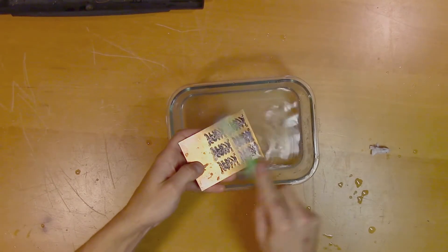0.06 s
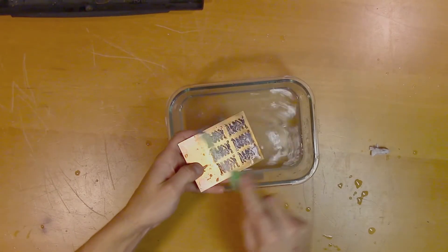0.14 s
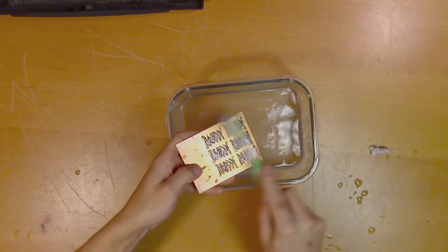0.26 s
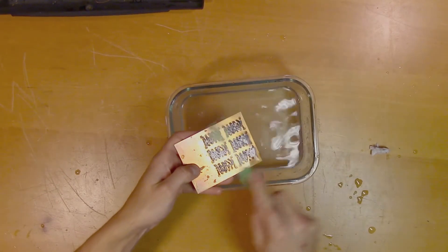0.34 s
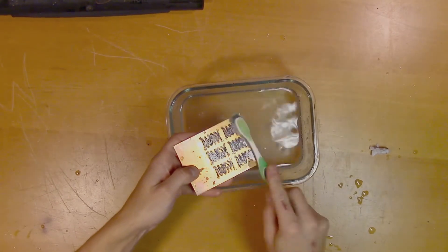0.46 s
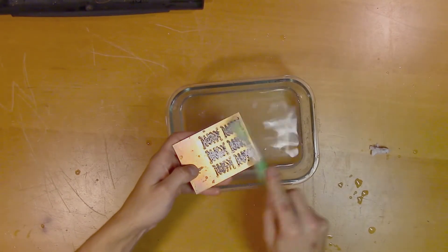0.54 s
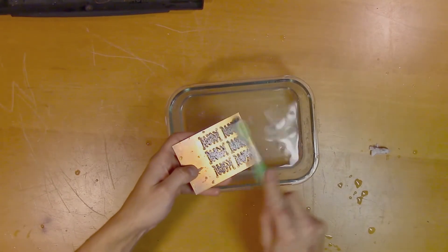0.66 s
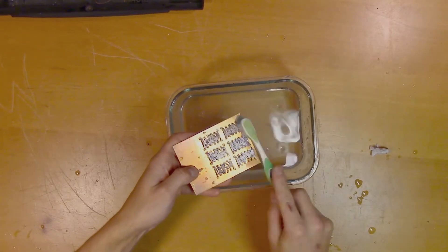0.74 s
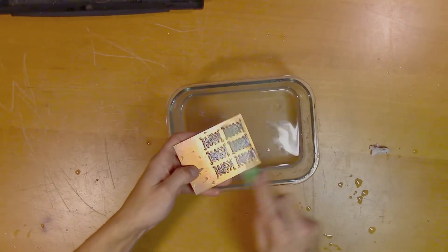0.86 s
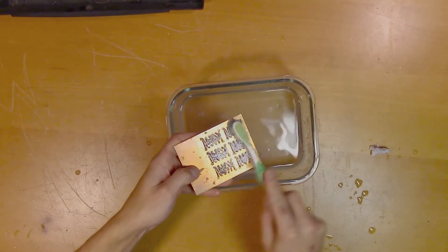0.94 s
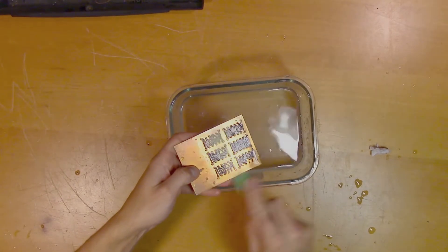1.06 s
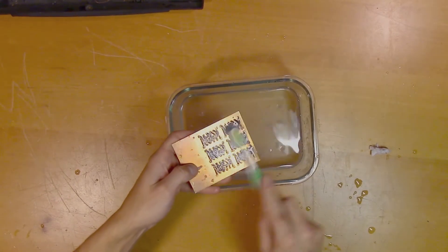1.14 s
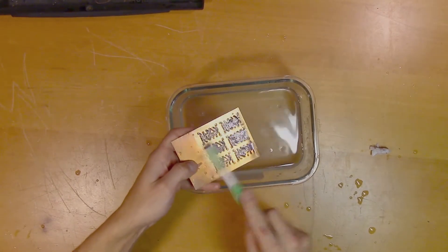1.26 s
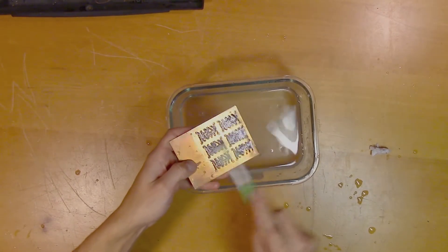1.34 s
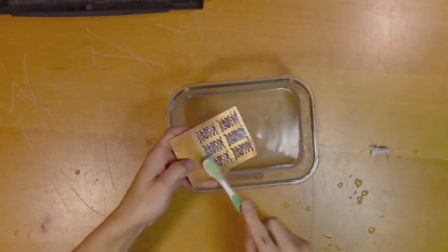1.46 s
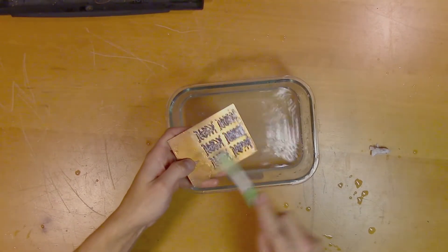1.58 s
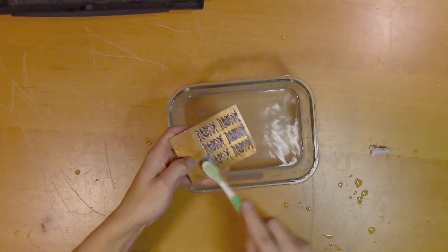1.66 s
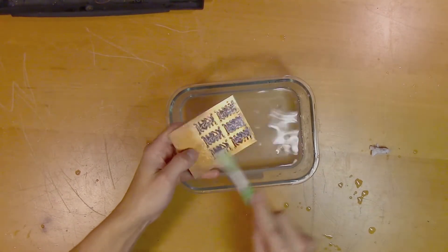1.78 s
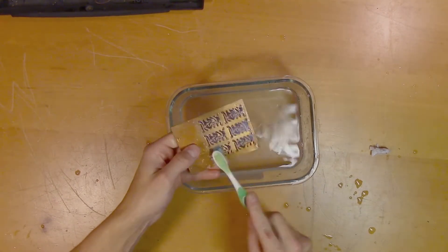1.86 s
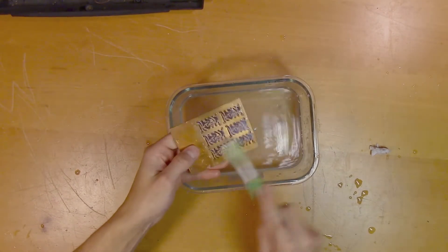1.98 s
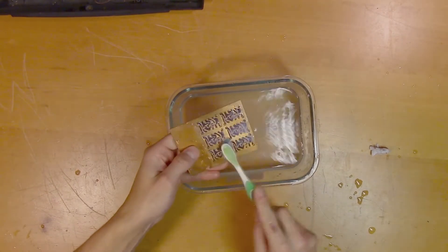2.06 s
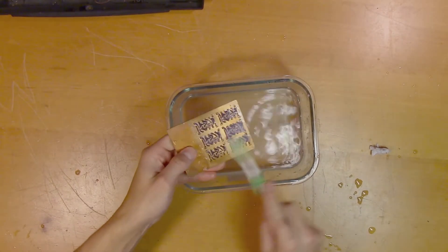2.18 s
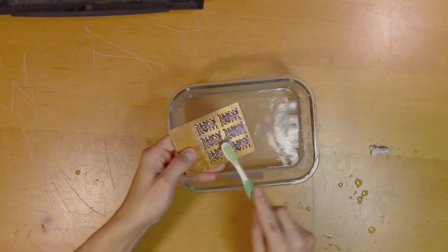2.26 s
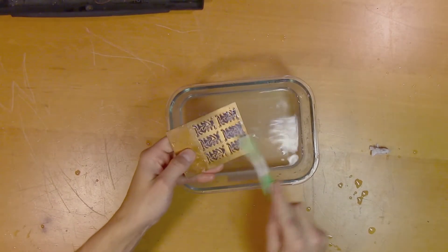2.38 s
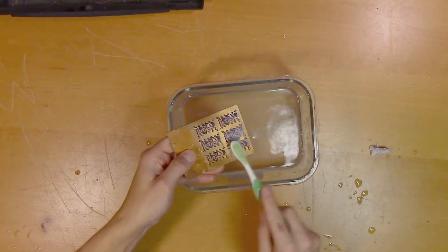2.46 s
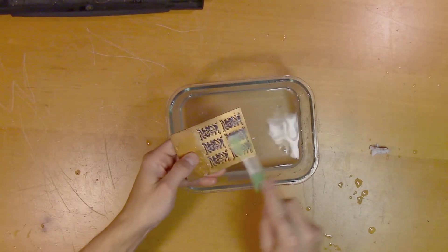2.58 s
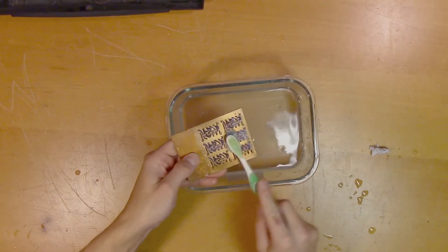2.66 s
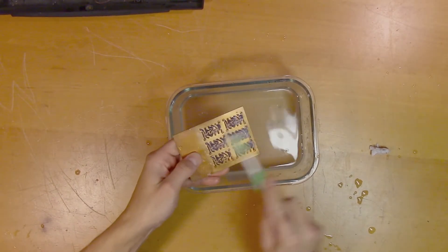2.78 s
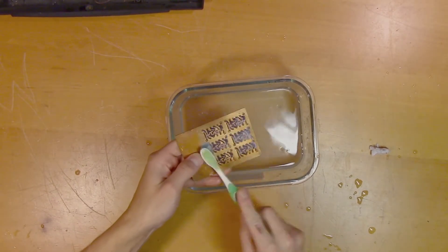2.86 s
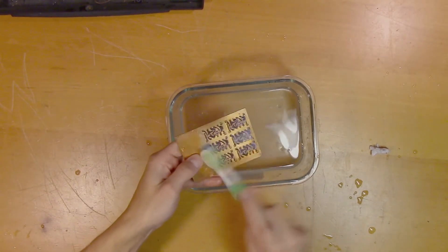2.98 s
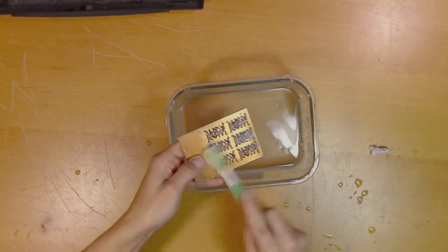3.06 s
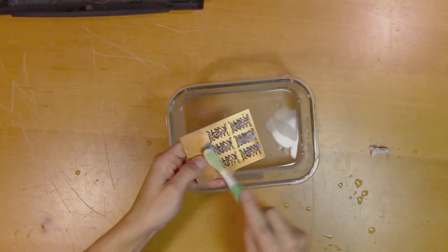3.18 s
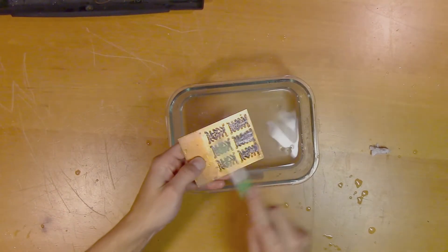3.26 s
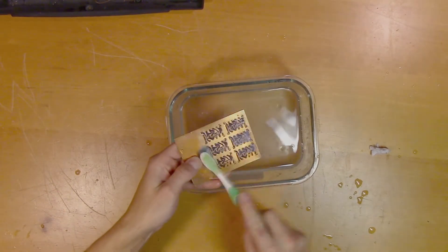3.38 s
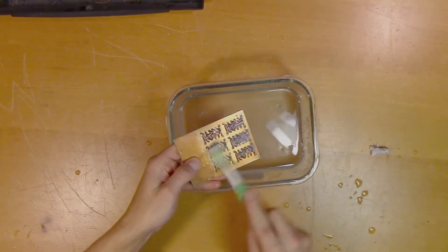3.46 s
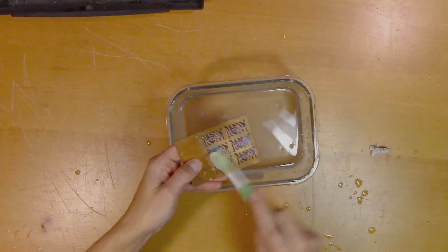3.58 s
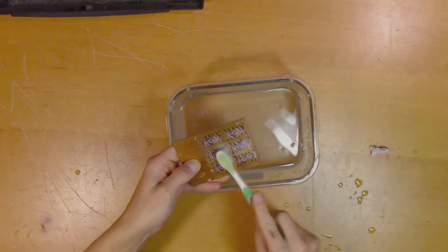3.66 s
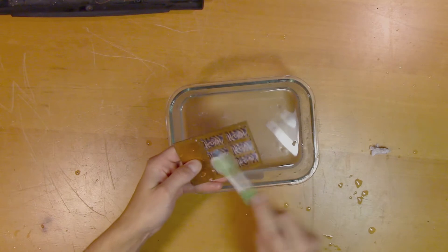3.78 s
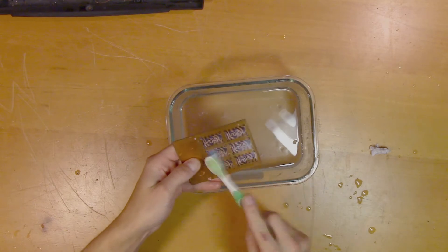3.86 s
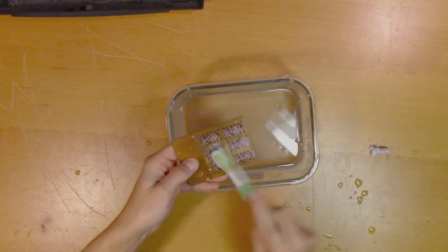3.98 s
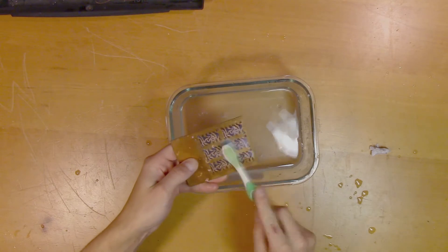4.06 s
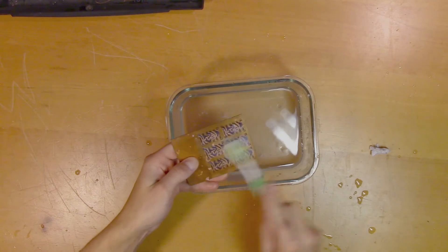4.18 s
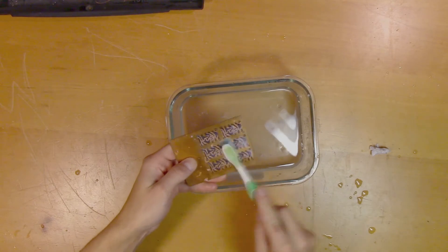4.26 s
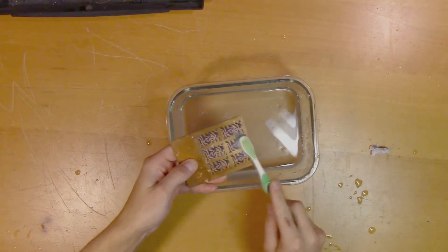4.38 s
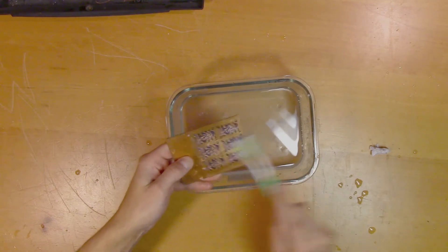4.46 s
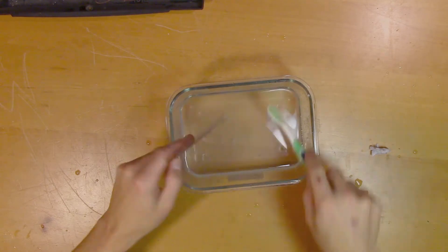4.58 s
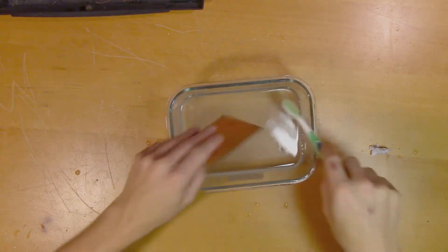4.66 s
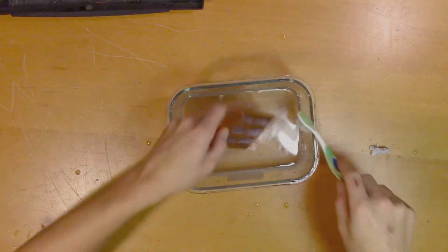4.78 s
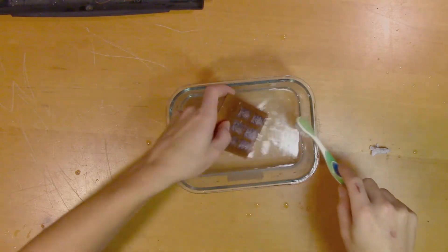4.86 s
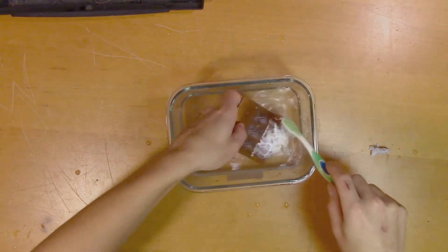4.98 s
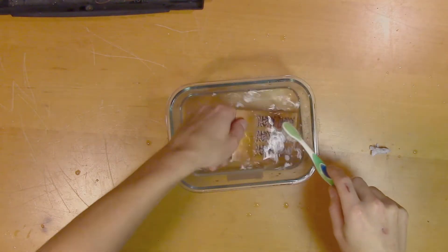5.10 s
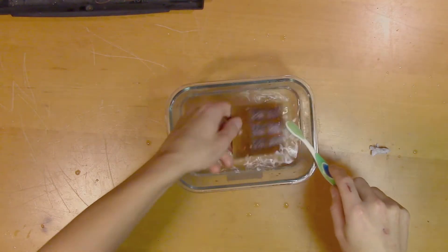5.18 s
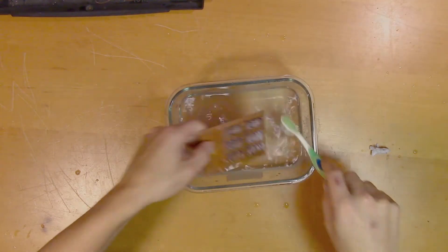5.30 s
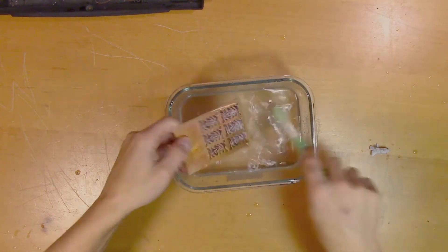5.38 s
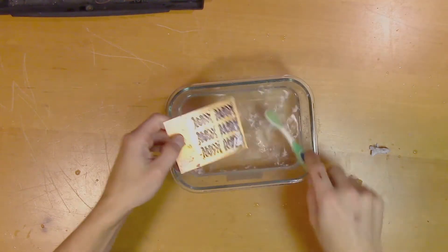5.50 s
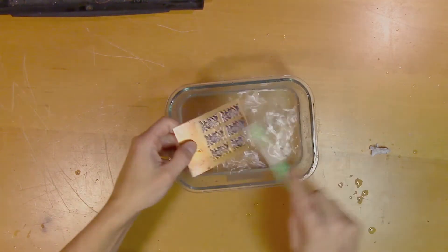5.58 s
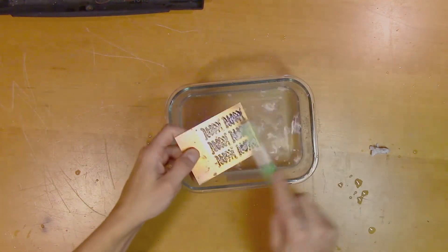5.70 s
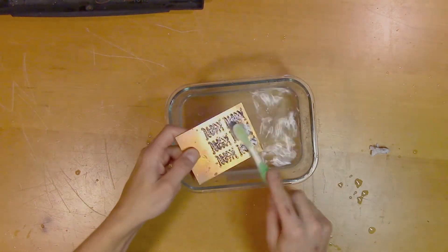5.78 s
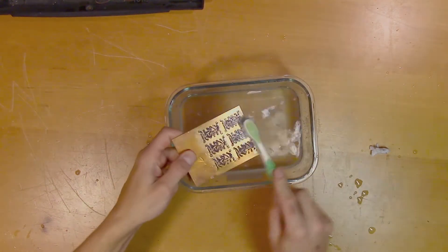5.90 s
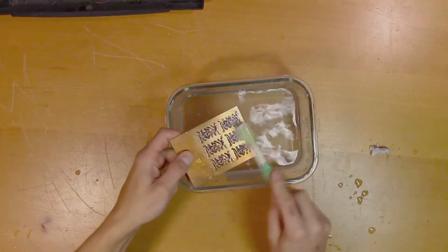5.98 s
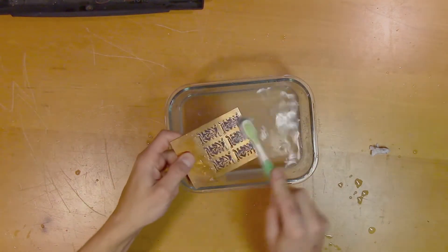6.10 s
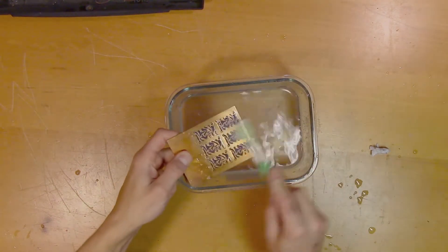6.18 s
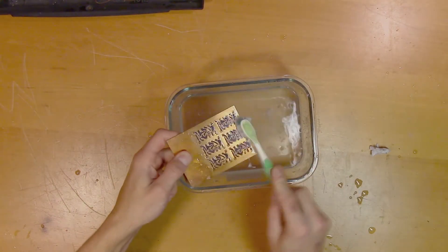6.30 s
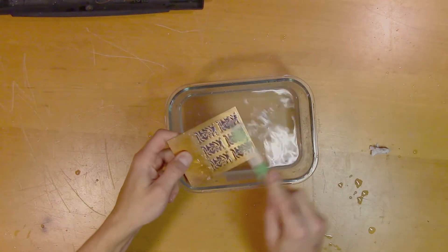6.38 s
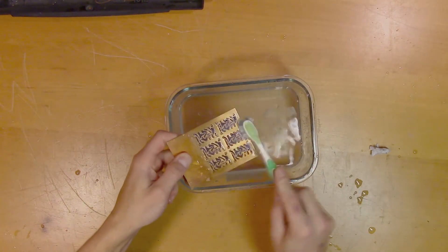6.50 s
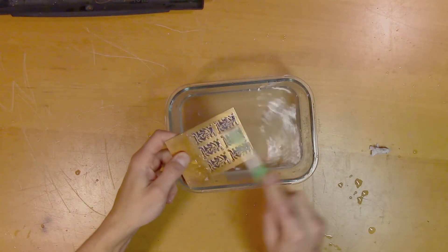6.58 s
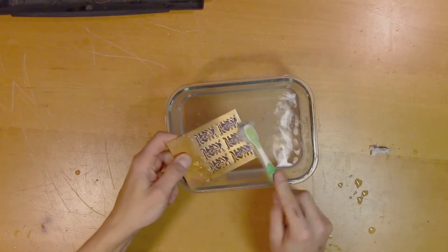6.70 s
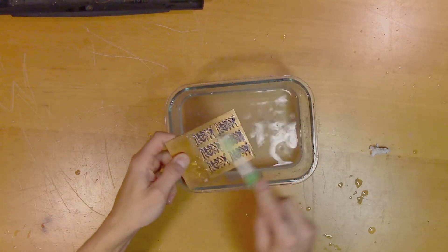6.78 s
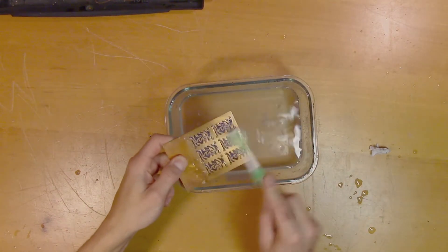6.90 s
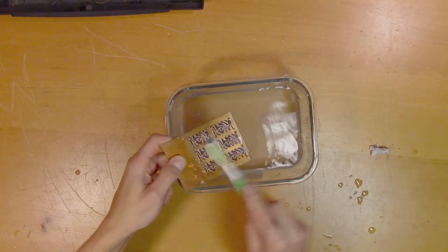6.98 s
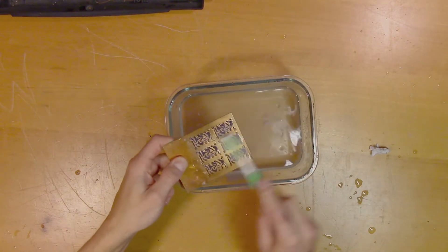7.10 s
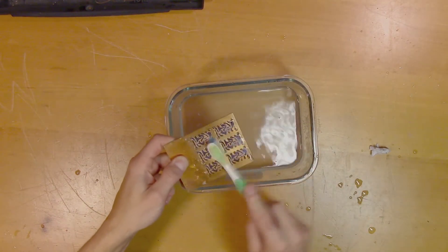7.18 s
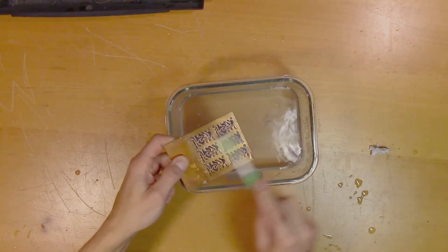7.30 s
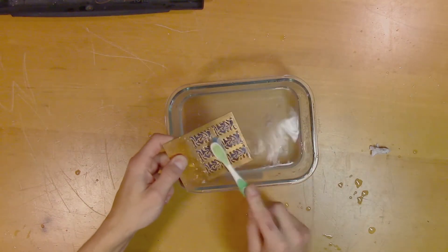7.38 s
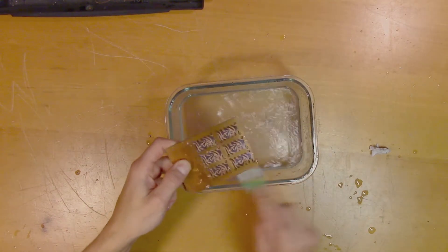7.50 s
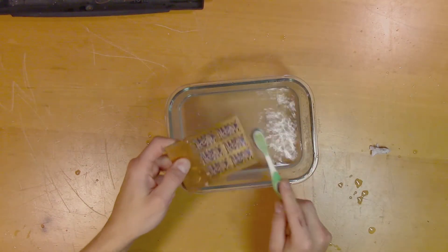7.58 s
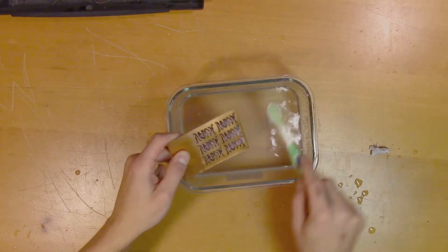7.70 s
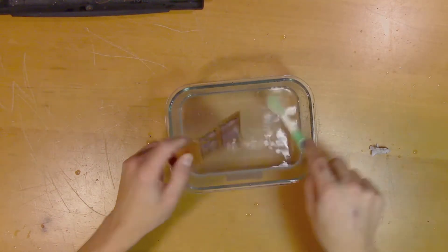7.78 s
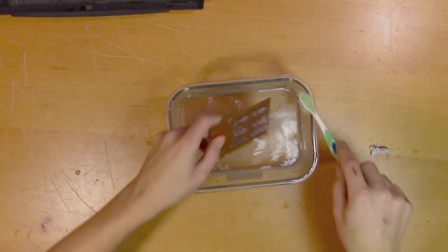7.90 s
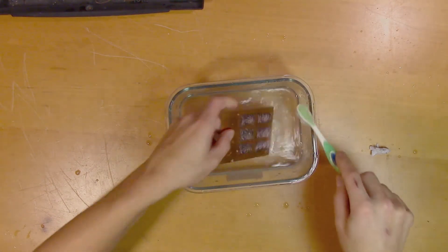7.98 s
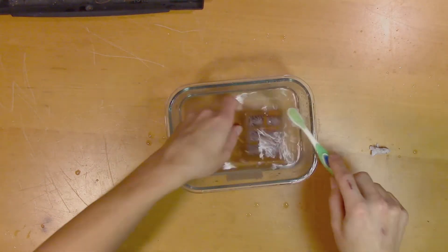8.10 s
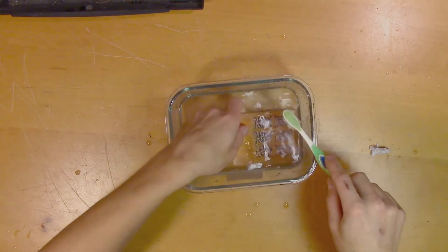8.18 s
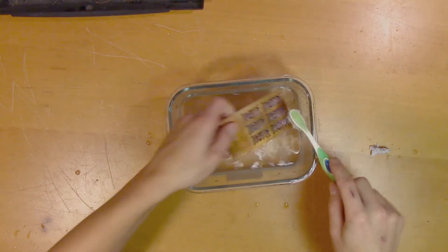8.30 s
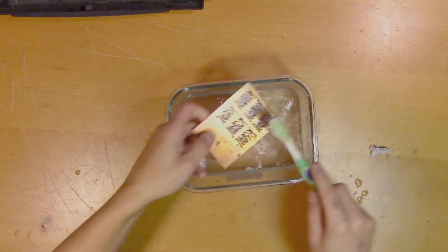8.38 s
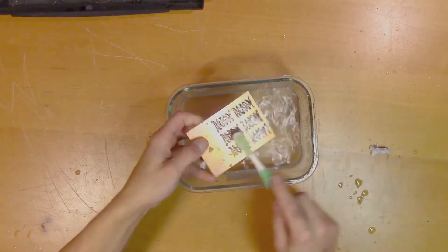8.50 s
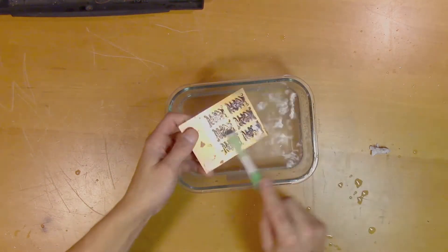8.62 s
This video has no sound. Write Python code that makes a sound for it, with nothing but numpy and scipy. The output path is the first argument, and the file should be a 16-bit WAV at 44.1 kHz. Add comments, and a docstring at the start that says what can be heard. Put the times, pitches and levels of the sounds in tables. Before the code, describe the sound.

A toothbrush scrubs a wet copper board from the start, in very fast, even strokes that blur into a bright, scratchy hiss. A dull knock and a tiny drip come right at the beginning. From about 2.5 seconds the board's edge grates briefly, again and again, on the rim of a glass dish, and the brushing grows a little firmer. It stops at 4.5 seconds. After a faint squeak, the board knocks loudly into the dish at 5 seconds, ringing the glass and thumping the wooden bench, followed by a short drag, clinks and small drips. Scrubbing resumes from 5.7 to 7.5 seconds. Another knock lands at 7.7, then clinks, a drag, faint wet squeaks and drips follow between 8 and 8.4 seconds. A few light strokes return at 8.5. The room is small and quiet, heard from overhead, almost in mono.

```python
"""A toothbrush scrubs a wet copper board, about twenty strokes a second: its bristles flick free
in such numbers that they blur into a hiss. Below is a glass dish of water on a wooden bench.
The board's edge grates on the rim. Twice the board is dipped: it knocks, drags and squeaks,
the dish rings and thumps the bench, and falling drops trap tiny ringing bubbles.
The room is small and quiet, heard almost in mono from overhead."""
import sys
import numpy as np
from scipy import signal
from scipy.fft import rfft, irfft, next_fast_len
from scipy.io import wavfile

SR = 44100
rng = np.random.default_rng(int(sys.argv[2]) if len(sys.argv) > 2 else 0)


def unload_audio(sound):
    """Save the sound as a 16-bit wav file, at the path given as the first command line argument."""
    columns = np.transpose(np.atleast_2d(sound))
    # keep every value between -1 and 1, then stretch to whole-number steps
    steps = np.round(np.clip(columns, -1, 1) * 32767)
    wavfile.write(sys.argv[1], SR, steps.astype(np.int16))


N = 381460
TIME = np.arange(N) / SR

# the wooden bench's own tones: pitch_hz, level_db, fade_s (a fade time is the time to fall 60 dB)
BENCH_TONES = [(149, -22, 0.16), (208, -29, 0.27), (263, -11.5, 0.24), (322.7, -4.5, 0.14), (432, -32, .12),
               (516.5, -1, 0.18), (541, 2.5, 0.16), (600, -7, 0.22), (725, -21, .11), (795, 3, 0.1),
               (873, -1, 0.079), (1195, -9, .065), (1480, -26, 0.053)]


def from_db(db):
    """Turn decibels into a number to multiply by."""
    return 10 ** (np.asarray(db) / 20)


def unit_level(x):
    """Scale a sound so that its average level (rms) is 1."""
    return x / np.sqrt(np.mean(x ** 2) + 1e-20)


def at_hz(points, hz):
    """Read between the rows of a table, with pitch spaced in octaves."""
    pitches, values = np.transpose(points)
    return np.interp(np.log(np.maximum(hz, 1)), np.log(pitches), values)


def coloured(noise, spectrum):
    """Give a noise its balance of low and high pitches, at level 1."""
    size = next_fast_len(N)
    gain = from_db(at_hz(spectrum, np.fft.rfftfreq(size, 1 / SR)))
    return unit_level(irfft(rfft(noise, size) * gain, size)[:N])


def low_pass(x, hz, order=2):
    """Turn down everything above a pitch."""
    return signal.sosfilt(signal.butter(order, min(hz, .45 * SR), fs=SR, output="sos"), x)


def high_pass(x, hz, order=2):
    """Turn down everything below a pitch."""
    return signal.sosfilt(signal.butter(order, hz, "high", fs=SR, output="sos"), x)


def resonance(x, hz, width_hz):
    """Keep a band around one pitch; a narrower band rings longer."""
    r = np.exp(-np.pi * width_hz / SR)
    feedback = [1, -2 * r * np.cos(2 * np.pi * hz / SR), r * r]
    return signal.lfilter(np.array([1, 0, -1]) * (1 - r * r) / 2, feedback, x + 1e-18)


def ringing(tones, length_s):
    """A struck object's fading tones, one per row."""
    hz, db, fade_s = np.transpose(tones)[:, :, None]
    t = np.arange(int(length_s * SR)) / SR
    return np.sin(2 * np.pi * hz * t) * from_db(db - 60 * t / fade_s)


def burst(noise, db, fade_s):
    """Noise that starts at a level and dies away."""
    fade = from_db(-60 * TIME[:len(noise)] / fade_s)
    return from_db(db) * unit_level(noise * fade) * np.sqrt(np.mean(fade ** 2))


def add(track, start_s, sound):
    """Mix a sound into a track at a given time."""
    start = max(round(start_s * SR), 0)
    part = sound[:max(N - start, 0)]
    track[start:start + len(part)] += part


def slide_speed(slides, rise_s, fall_s):
    """Each slide speeds up, holds and stops; faster means louder."""
    out = np.zeros(N)
    for start_s, length_s, db in slides:
        near = slice(max(int((start_s - .03) * SR), 0), int((start_s + length_s + .05) * SR))
        t = TIME[near] - start_s
        rise = (1 + np.tanh(t / rise_s)) / 2
        fall = (1 + np.tanh((length_s - t) / fall_s)) / 2
        out[near] += from_db(db) * rise * fall
    return out


def slips(per_s, spread_db):
    """Rubbing surfaces catch and let go in tiny, uneven clicks."""
    sizes = from_db(spread_db * np.minimum(rng.exponential(1, N), 5))
    return unit_level((rng.random(N) < per_s / SR) * sizes * rng.standard_normal(N))


def room_air(middle_db=-58.5, side_db=-65):
    """A faint, steady rush of air from all sides, in stereo."""
    # the air both channels share: pitch_hz, level_db
    middle_colour = [(25, -28.5), (90, -21), (125, -25.5), (170, -12.5), (400, -7), (590, -3.5), (1000, -7),
                     (1700, -10.5), (2600, -13), (4000, -16.5), (12500, -22.5), (16000, -26.5)]
    # the air that differs left and right: pitch_hz, level_db
    side_colour = [(25, -13), (90, -8), (180, -5), (400, 4.5), (600, 8.5), (1300, 5), (2400, -7.5),
                   (4400, -28), (8000, -30), (15000, -38.5)]
    middle = from_db(middle_db) * coloured(rng.standard_normal(N), middle_colour)
    side = from_db(side_db) * coloured(rng.standard_normal(N), side_colour)
    return middle + side * np.array([[1], [-1]])


def room(x, echo_db, build_s=.0027, bounce_db=-14, bounce_s=.0021):
    """Add one bounce off the bench, then a short wash of echoes from the walls."""
    # how long the echoes last: pitch_hz, fade_s
    echo_fades = [(150, 0.18), (600, 0.15), (2500, 0.27), (7000, 0.163), (15000, 0.13)]
    t = TIME[:SR // 2]
    edges_hz, tail = np.geomspace(90, 18000, 9), 0
    for low, high in zip(edges_hz, edges_hz[1:]):
        band_filter = signal.butter(2, [low, high], "band", fs=SR, output="sos")
        band = signal.sosfilt(band_filter, rng.standard_normal(len(t)))
        tail += band * from_db(-60 * t / at_hz(echo_fades, np.sqrt(low * high)))
    walls = unit_level(tail * (1 - np.exp(-(t / build_s) ** 2))) / np.sqrt(len(t))
    bounce = from_db(bounce_db) * np.interp(TIME - bounce_s, TIME, x, left=0)
    return x + bounce + from_db(echo_db) * signal.fftconvolve(x, walls)[:N]


def squeaks(wobble=.012):
    """A wet edge sticks and slips evenly on glass: a shaky tone and its octave."""
    # squeaks: start_s, length_s, pitch_hz, glide_share, level_db, octave_db
    wet_rubs = [(4.781, 0.103, 4174, 0, -57, -25), (8.243, 0.012, 3800, .01, -51, -13),
                (8.249, 0.025, 2540, .12, -45, -3), (8.275, .026, 4200, 0.0062, -59, -21)]
    out = np.zeros(N)
    for start_s, length_s, hz, glide, db, octave_db in wet_rubs:
        progress = np.linspace(0, 1, int(length_s * SR))
        waver = unit_level(low_pass(rng.standard_normal(SR // 4), hz=500))[:len(progress)]
        phase = 2 * np.pi * np.cumsum(hz * (1 + glide * progress + wobble * waver)) / SR
        tone = np.sin(phase) + from_db(octave_db) * np.sin(2 * phase)
        add(out, start_s, from_db(db) * np.sin(np.pi * progress) * tone)
    return out


def drops(pitch_rise=.07, splash_db=-13, splash_fade_s=.044):
    """A drop splashes and traps a bubble, whose pitch rises as it nears the surface."""
    # trapped bubbles: start_s, pitch_hz, level_db, fade_s
    bubbles = [(.057, 5560, -35.5, 0.048), (1.851, 4180, -45, 0.15), (1.855, 4840, -42, 0.049),
               (5.3, 10200, -37.5, 0.018), (5.441, 7830, -34, 0.0144), (5.494, 5470, -44.5, 0.028),
               (8.3, 13200, -34, 0.017), (8.302, 6950, -48, .012), (8.367, 6700, -31.5, 0.029)]
    out, t = np.zeros(N), TIME[:SR // 20]
    for start_s, hz, db, fade_s in bubbles:
        phase = 2 * np.pi * hz * (t + pitch_rise * t * t / (2 * fade_s))
        bubble = np.sin(phase) * from_db(-60 * t / fade_s)
        splash = unit_level(resonance(rng.standard_normal(len(t)), hz, width_hz=hz))
        splash *= from_db(splash_db - 60 * t / splash_fade_s)
        add(out, start_s, from_db(db) * (bubble + splash))
    return out


def dragging(cutoff_hz=1300, rough_db=-3, hum_db=-4):
    """The board judders over the bottom of the dish and shakes the bench."""
    # drags: start_s, length_s, level_db
    drags = [(.12, 0.026, -49), (5.105, .13, -45.5), (5.19, 0.028, -48), (8.16, 0.036, -41.5),
             (8.2, .13, -65), (8.57, .053, -57.5)]
    force = slips(per_s=600, spread_db=1.5)
    bench = unit_level(signal.fftconvolve(force, ringing(BENCH_TONES, length_s=.5).sum(axis=0))[:N])
    hum = from_db(hum_db) * resonance(force, hz=155, width_hz=14)
    rough = from_db(rough_db) * unit_level(resonance(force, hz=850, width_hz=230) + hum)
    return low_pass(bench + rough, cutoff_hz) * slide_speed(drags, rise_s=.0046, fall_s=.02)


def knocks(clack_fade_s=.058, tone_db=-3, node_depth=.51):
    """Each knock rings the glass, thumps the bench and makes the hand-held board clack."""
    # the board hits the dish: start_s, bench_db, glass_db, clack_db, clack_hz, cutoff_hz, place_radians
    hits = [(.098, -25.5, -51, -26.5, 953, 800, 0.6), (.116, -40, -75, -35, 333, 600, 1),
            (4.753, -55, -62, -44.5, 2010, 3970, 0.96), (4.953, -30.5, -70, -43, 900, 1000, 1),
            (4.9661, -16, -46, -13, 1174, 2900, .45), (4.9722, -16, -53, -12, 532, 2050, .6),
            (4.975, -26, -24, -23, 2640, 6500, 1.36), (4.977, -43, -52, -31.5, 6200, 8000, .6),
            (4.986, -25, -42, -24, 2620, 2960, 0.68), (5.0517, -32.5, -31, -29, 5340, 6050, 1.34),
            (5.1691, -58, -38.5, -30, 4650, 12000, 0.25), (5.169, -66.5, -60, -33, 5640, 14000, .4),
            (5.441, -80, -53.5, -59, 4190, 12000, .4), (7.683, -24, -33, -19.5, 950, 1170, 1.4),
            (7.695, -27, -53, -27, 980, 1510, 1.2), (7.973, -75.5, -66, -55, 2330, 4000, .4),
            (8.052, -68, -26.5, -26.5, 2370, 8000, 0.054), (8.054, -41, -61, -30.5, 830, 1200, .05),
            (8.064, -57.5, -36, -34, 4150, 4970, .054), (8.139, -64, -35, -26.5, 5000, 14100, 0.19)]
    # the glass dish's own tones: pitch_hz, level_db, fade_s
    glass_tones = [(935, -5.5, 0.13), (1636.3, 1, 0.61), (2003, -14, 0.097), (2434, 3, 0.067),
                   (2486, -2.5, 0.083), (2660, 1, 0.14), (3140, -36, .1), (3770, -27, .11),
                   (4167, -4, 0.17), (4750, -26, .09), (5539, -21, 0.14), (6200, -10, 0.11),
                   (7730, -13, .08), (8230, -9.5, 0.12), (11700, -14, .11), (12424, -20, 0.14),
                   (13750, -15.5, .1)]
    out, t = np.zeros(N), TIME[:SR // 4]
    glass = ringing(glass_tones, length_s=1)
    bench = from_db(-11.5) * ringing(BENCH_TONES, length_s=1).sum(axis=0)
    for start_s, bench_db, glass_db, clack_db, clack_hz, cutoff_hz, place in hits:
        # a tone is quieter when struck near its node, a still spot on the rim
        strengths = 1 - node_depth * np.sin(np.arange(len(glass)) * place) ** 2
        ring = from_db(glass_db) * (strengths @ glass) + from_db(bench_db) * bench
        add(out, start_s, low_pass(ring, cutoff_hz, order=1))   # a softer hit is duller
        clack, crack, thud = rng.standard_normal((3, len(t)))
        clack = burst(resonance(clack, clack_hz, width_hz=clack_hz / 7), db=0, fade_s=clack_fade_s)
        crack = burst(resonance(crack, cutoff_hz / 2, width_hz=cutoff_hz), db=-6, fade_s=.0083)
        tone = np.sin(2 * np.pi * clack_hz * t) * from_db(tone_db - 60 * t / clack_fade_s)
        add(out, start_s, from_db(clack_db) * (tone + low_pass(clack + crack, 2 * cutoff_hz)))
        thud = low_pass(high_pass(thud, hz=320, order=3), hz=1020)   # many short bench tones merge
        add(out, start_s, burst(thud, db=bench_db - 9, fade_s=.13))
    return out


def grating():
    """The board's edge sticks and slips along the rim of the dish."""
    # scrapes on the rim: start_s, length_s, level_db
    scrapes = [(2.565, 0.036, -50), (2.612, 0.0085, -51), (2.66, 0.068, -53.5), (2.735, 0.032, -45.5),
               (3.132, 0.0584, -43), (3.505, 0.074, -53), (3.615, 0.0346, -44), (4.03, .045, -51),
               (4.08, 0.036, -43), (4.43, 0.067, -51.5), (4.539, 0.0082, -38.5), (4.752, 0.028, -47),
               (7.44, 0.032, -59)]
    # their balance of low and high: pitch_hz, level_db
    scrape_colour = [(80, -42), (250, -24.5), (480, -11.5), (700, 2.5), (1150, -0.5), (1650, -7),
                     (2300, -14), (4000, -12.5), (8000, -41)]
    rasp = coloured(slips(per_s=2700, spread_db=1), scrape_colour)
    return rasp * slide_speed(scrapes, rise_s=.0023, fall_s=.0085)


def strokes(length_spread=.07, level_spread_db=.78, bright_spread_db=1, lead_share=.53):
    """The hand pulls and pushes in turn, and no two strokes are quite alike."""
    # the hand's pace, one list per spell of scrubbing: mid_stroke_s, strokes_done
    spells = [
        [(.04, 0), (.382, 7), (.66, 13), (1.143, 23), (1.663, 34), (2.222, 45), (2.413, 49), (2.575, 52),
         (2.765, 56), (3.289, 66), (3.724, 75), (4.078, 82), (4.312, 87), (4.487, 91)],
        [(5.694, 0), (5.955, 5), (6.101, 8), (6.662, 19), (7.034, 26), (7.444, 34)],
        [(8.535, 0), (8.642, 2)],
    ]
    # how hard the brush presses: time_s, level_db
    pressure = [(0, -43), (.25, -43), (.5, -44.5), (.95, -43), (1.35, -43.5), (1.85, -46), (2.43, -46.5),
                (2.52, -55), (2.62, -46), (2.75, -45), (2.92, -40), (3.22, -41), (3.62, -39.5), (3.68, -45),
                (4.03, -39.5), (4.12, -44), (4.49, -45), (5.69, -56.5), (5.85, -45.5), (6.45, -44.5),
                (7.38, -44), (7.44, -41), (8.56, -57.5), (8.645, -53)]
    # bristle tips sound brighter than flattened tufts: time_s, brightness_db
    brightness = [(0, -0.5), (.85, 1), (1.2, -1), (2.2, 0), (3, -1), (3.45, -2), (3.75, 1), (4.45, -2),
                  (5.9, -2), (6.1, -11), (6.26, 1), (6.42, -9), (6.58, -1), (6.93, -3.5), (7.1, -1),
                  (7.44, -1.5)]
    # the pull and the firmer push: sliding_share (of the stroke's time), level_db, brightness_db
    pull = (0.62, -0.52, -0.45)
    push = (0.56, 0.72, .6)
    rows = []
    for spell in spells:
        times, done = np.transpose(spell)
        middles = np.interp(np.arange(done[-1] + 1), done, times)
        for k, (middle_s, period_s) in enumerate(zip(middles, np.gradient(middles))):
            rows.append((middle_s, period_s, *(push if k % 2 else pull)))
    middle_s, period_s, sliding_share, db, bright_db = np.transpose(rows)
    chance = rng.standard_normal((len(rows), 3)).T
    length_s = period_s * sliding_share * (1 + length_spread * chance[0])
    db += np.interp(middle_s, *np.transpose(pressure)) + level_spread_db * chance[1]
    bright_db += np.interp(middle_s, *np.transpose(brightness)) + bright_spread_db * chance[2]
    return middle_s - lead_share * length_s, length_s, db, bright_db


def stroke_colour(hiss, starts, lengths, boost_db=5, lowest_hz=4500, highest_hz=14000, count=3):
    """Each stroke's hiss gets a few faint, narrow peaks at random pitches."""
    out = hiss.copy()
    for start_s, length_s, places in zip(starts, lengths, rng.random((len(starts), count))):
        stroke = hiss[max(int(start_s * SR), 0):int((start_s + length_s) * SR) + SR // 200]
        for hz in lowest_hz * (highest_hz / lowest_hz) ** places:
            add(out, start_s, (from_db(boost_db) - 1) * resonance(stroke, hz, width_hz=350))
    return out


def board_and_dish(hiss):
    """The ring that board and dish add to the hiss; the board's changes with each grip."""
    # the board's tones, one list per grip: pitch_hz, width_hz, boost_db
    board_tones = [
        [(5900, 140, 12), (1900, 340, 12)],
        [(5970, 170, 11.5), (2180, 300, 9)],
        [(2200, 300, 8.5), (10100, 500, 4.5), (12000, 400, 5)],
        [(2310, 250, 6.5), (5960, 180, 5), (9750, 250, 2.5)],
        [(2440, 180, 12.5), (4500, 920, 5), (5850, 200, 5.5), (11730, 160, 7.5)],
    ]
    # when the hand shifts its grip: time_s
    grip_changes = (1.1, 1.85, 2.55, 5.6)
    # the dish's tones: pitch_hz, width_hz, boost_db
    dish_tones = [(2604, 17, 8), (3650, 32, 7.5), (4155, 86, 9), (6380, 190, 3.5), (7180, 120, 2),
                  (8350, 94, 3.5), (9340, 140, 4.5), (13420, 200, 0)]
    out = np.zeros(N)
    grip = np.searchsorted(grip_changes, TIME)
    for k, tones in enumerate(board_tones):
        for hz, width_hz, boost_db in tones:
            out += (from_db(boost_db) - 1) * resonance(hiss * (grip == k), hz, width_hz)
    for hz, width_hz, boost_db in dish_tones:
        out += (from_db(boost_db) - 1) * resonance(hiss, hz, width_hz)
    return out


def toothbrush(treble_hz=8000, creep_db=-15, flutter_db=1.57, gain_db=-2.38):
    """Bristles flick free, tuft by tuft, in every stroke and shake the board."""
    # the bristles' balance of low and high: pitch_hz, level_db
    bristle_colour = [(60, -43), (250, -22), (700, -7), (1500, -10.5), (2300, -4.5), (2900, -4.5),
                      (3600, -9), (4800, -3), (6500, 0.5), (9000, 0.5), (11000, 0), (13500, 2.5),
                      (16000, 1)]
    starts, lengths, db, bright_db = strokes()
    slides = np.transpose([starts, lengths, db])
    speed = slide_speed(slides, rise_s=.0025, fall_s=.0055)
    # bent bristles still creep as the hand turns
    creep = from_db(creep_db) * slide_speed(slides, rise_s=.042, fall_s=.015)
    flicks = slips(per_s=16000, spread_db=-.5)
    flutter = from_db(flutter_db * unit_level(low_pass(rng.standard_normal(N), hz=98)))
    hiss = coloured(flicks * flutter, bristle_colour) * (speed + creep)
    # a brighter stroke gets more treble and less of the rest
    dull = low_pass(hiss, treble_hz, order=1)
    tilt = from_db(np.interp(TIME, starts + lengths / 2, bright_db))
    hiss = (dull / tilt + (hiss - dull) * tilt) / np.sqrt((tilt ** 2 + tilt ** -2) / 2)
    return from_db(gain_db) * (stroke_colour(hiss, starts, lengths) + board_and_dish(hiss))


def scene(bass_leak_db=-22):
    """The scrubbing and dipping sit in the middle, with the room air all around."""
    scrubbing = room(toothbrush() + grating(), echo_db=-11)
    bumps = knocks() + dragging()
    # small objects give off little bass
    bumps = high_pass(bumps, hz=150, order=6) + from_db(bass_leak_db) * low_pass(bumps, hz=50)
    bumps = room(bumps, echo_db=-17.5, bounce_db=-28)
    wet_sounds = room(drops() + squeaks(), echo_db=-8.5)
    return scrubbing + bumps + wet_sounds + room_air()


def record(dry, bass_cut_hz=25, treble_cut_hz=15750):
    """Cut the deepest bass and the highest treble."""
    treble_cut = signal.ellip(10, .1, 80, treble_cut_hz, fs=SR, output="sos")
    return signal.sosfilt(treble_cut, high_pass(dry, bass_cut_hz, order=1))


dry = scene()
out = record(dry)
unload_audio(out)
```